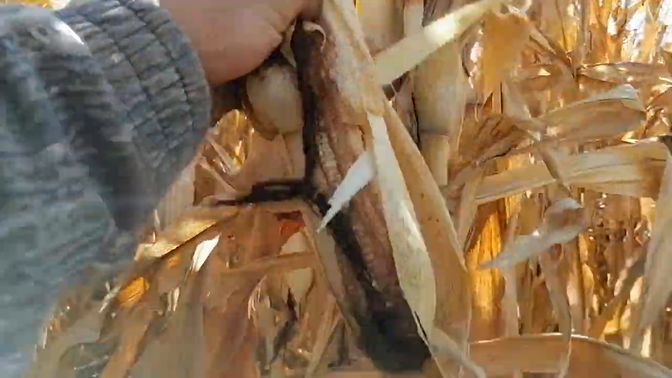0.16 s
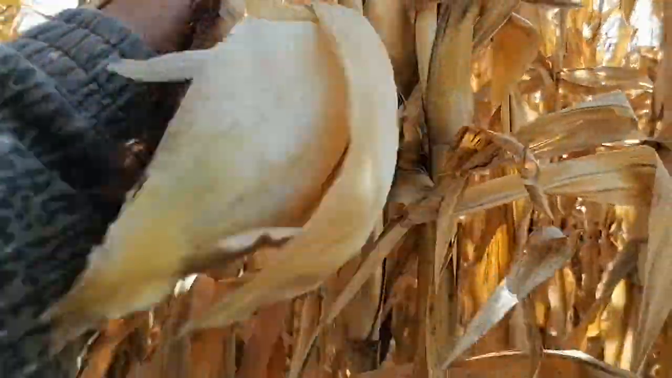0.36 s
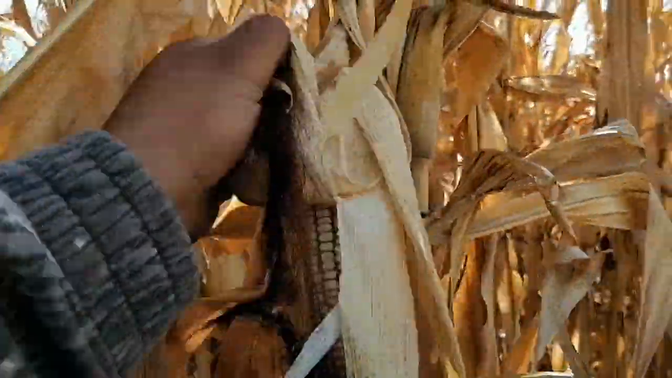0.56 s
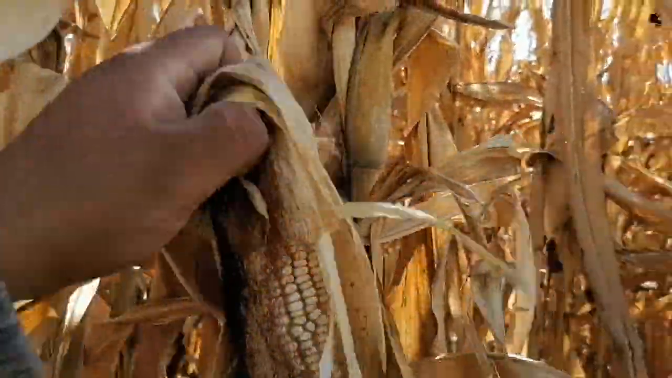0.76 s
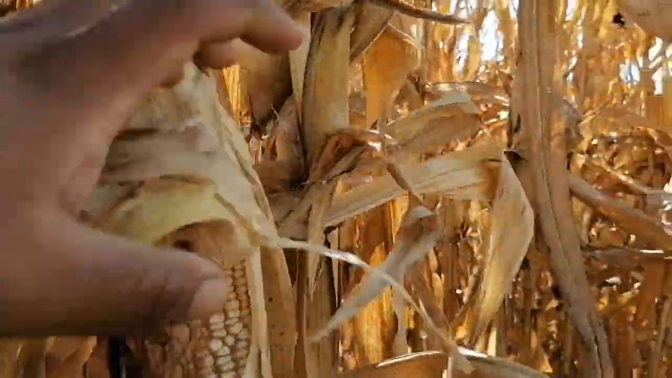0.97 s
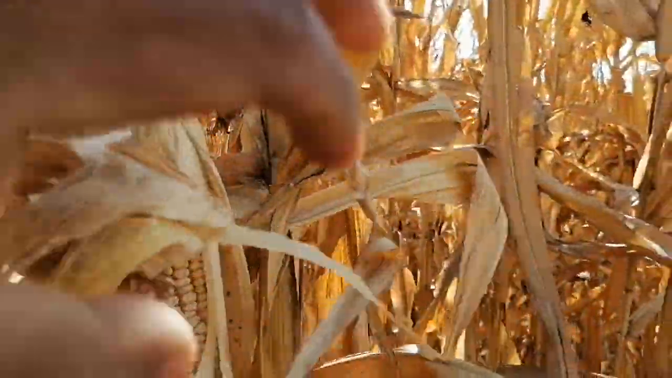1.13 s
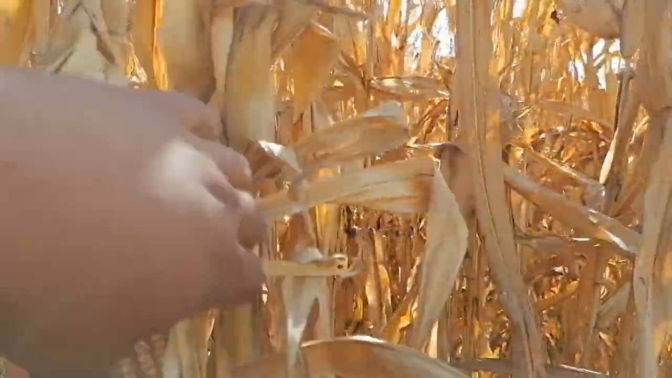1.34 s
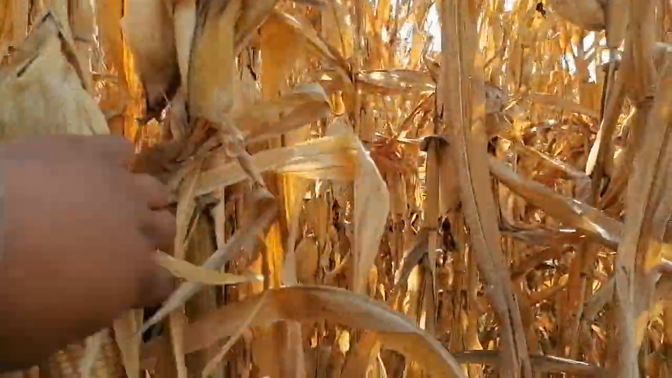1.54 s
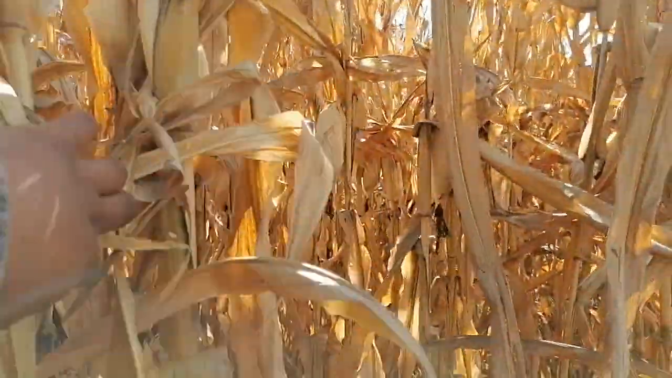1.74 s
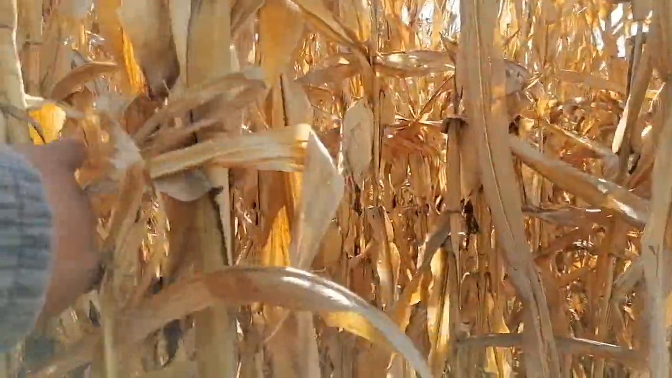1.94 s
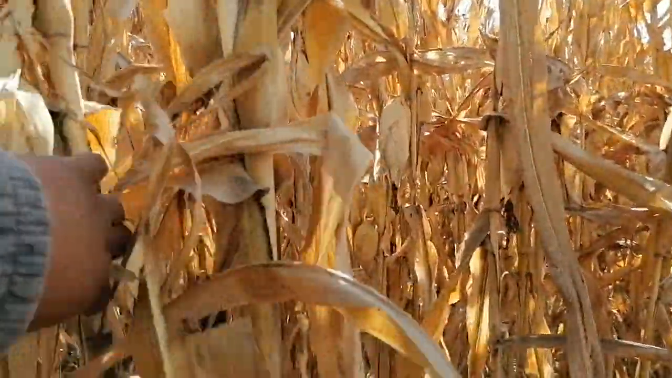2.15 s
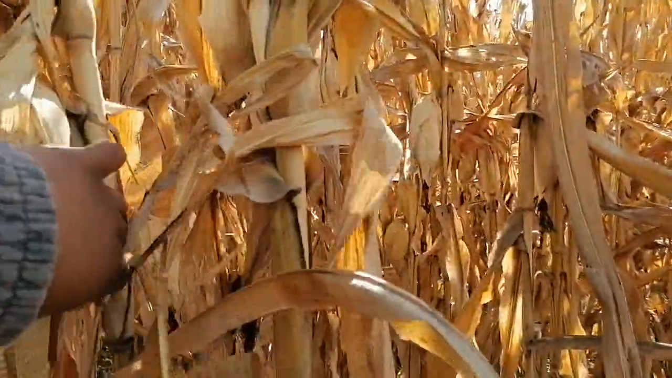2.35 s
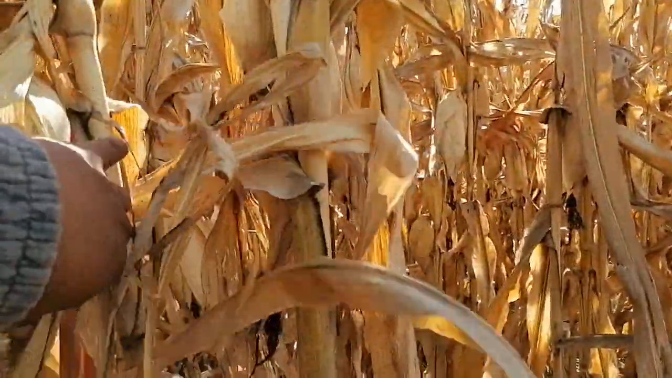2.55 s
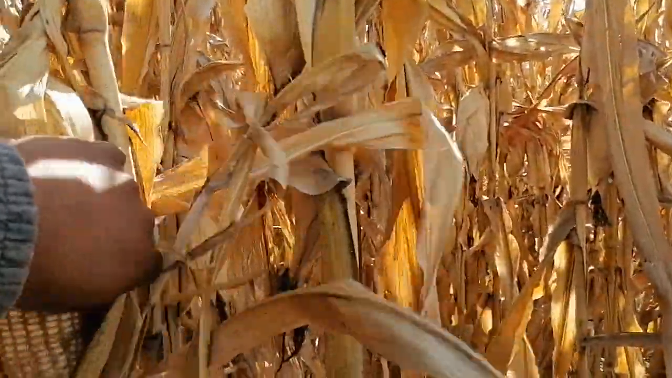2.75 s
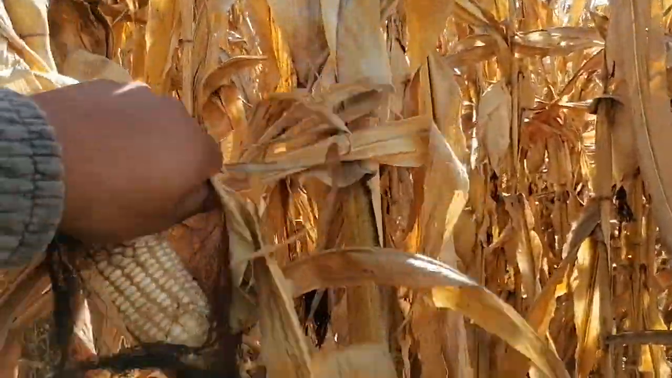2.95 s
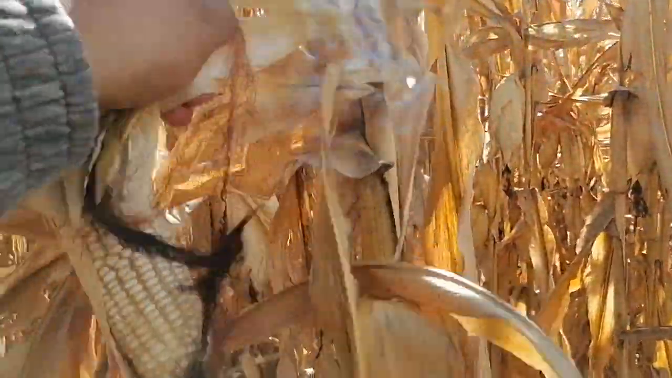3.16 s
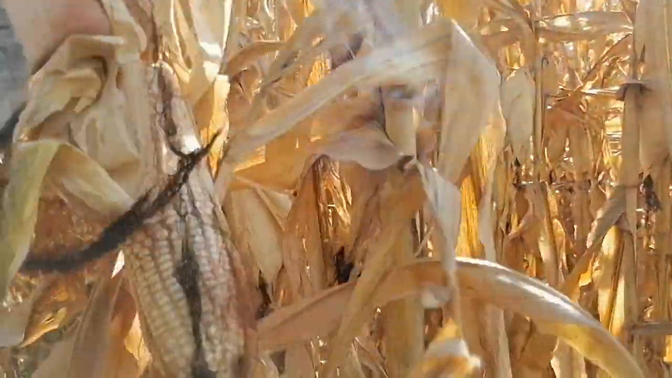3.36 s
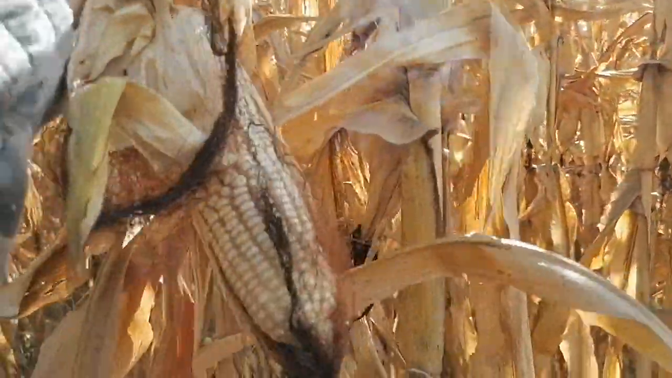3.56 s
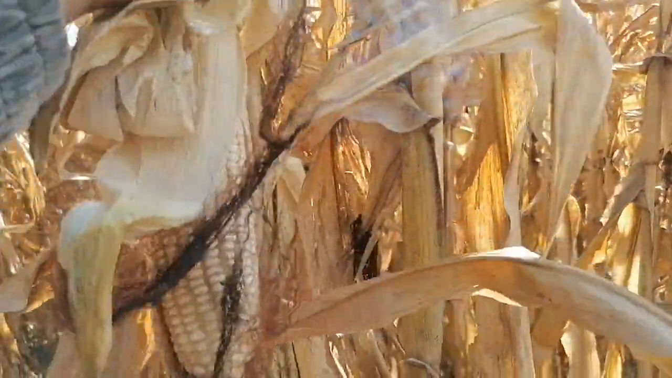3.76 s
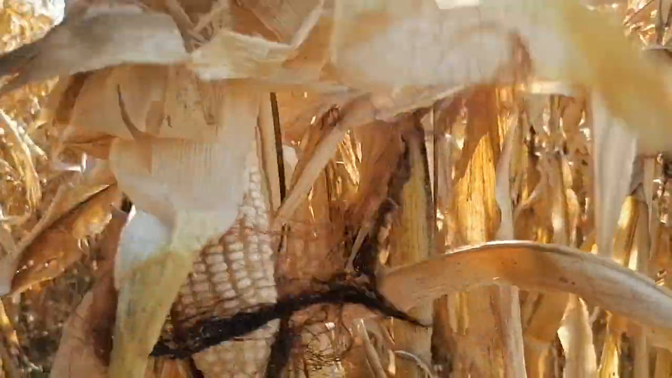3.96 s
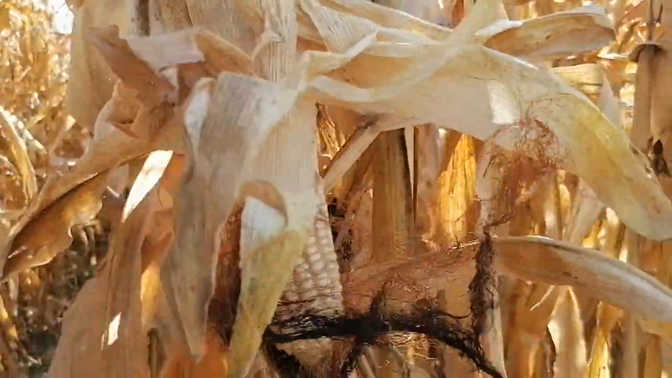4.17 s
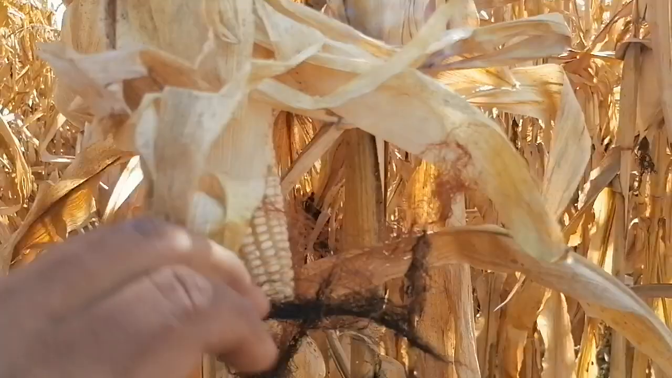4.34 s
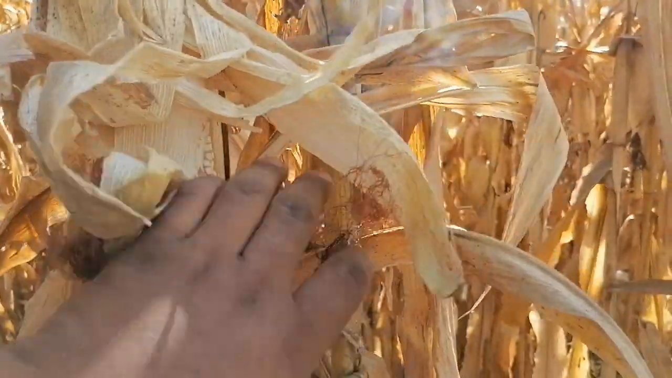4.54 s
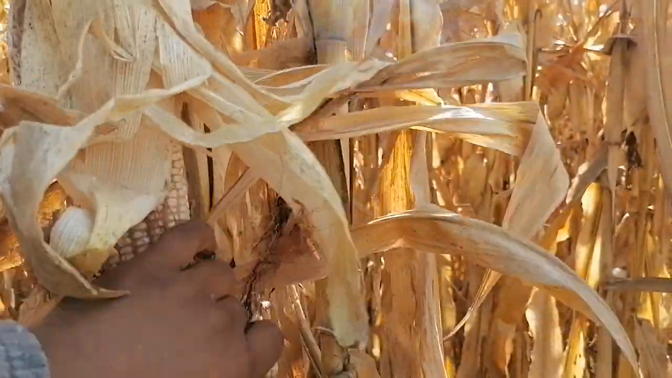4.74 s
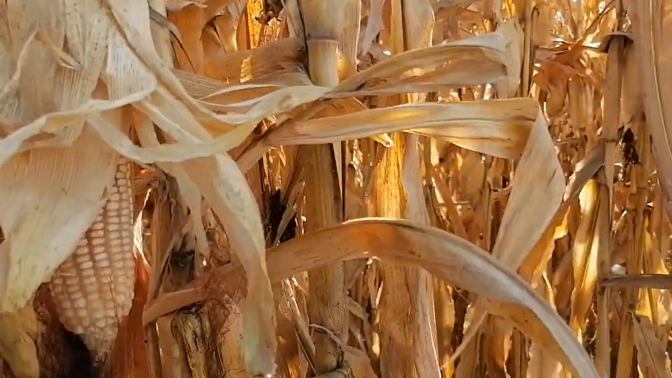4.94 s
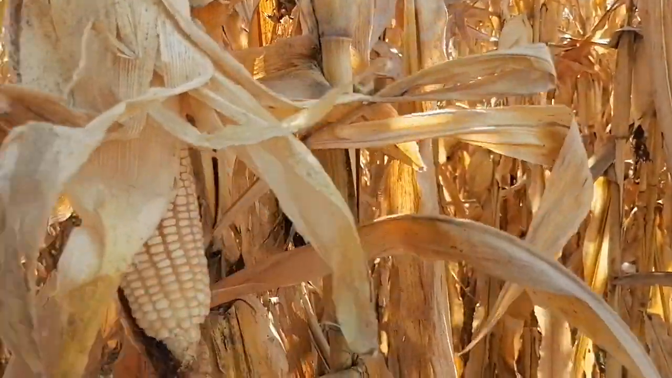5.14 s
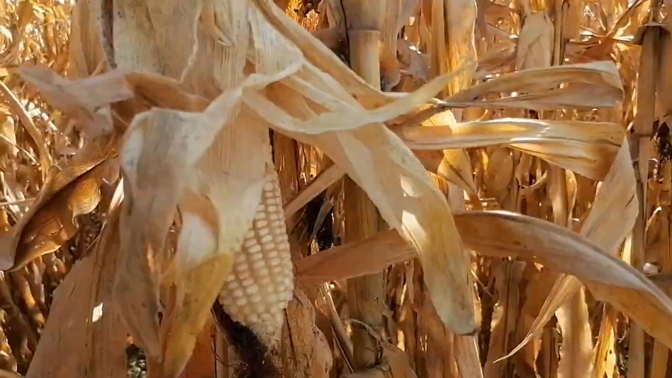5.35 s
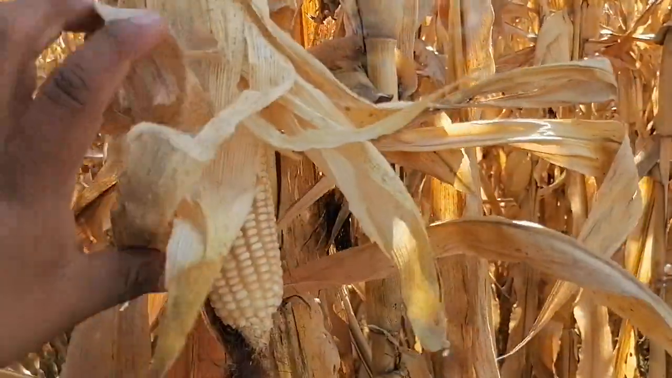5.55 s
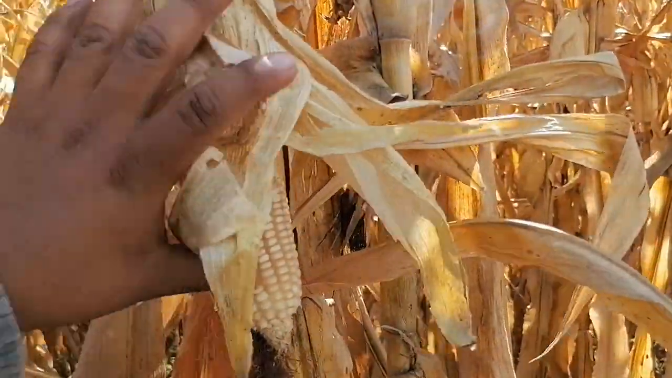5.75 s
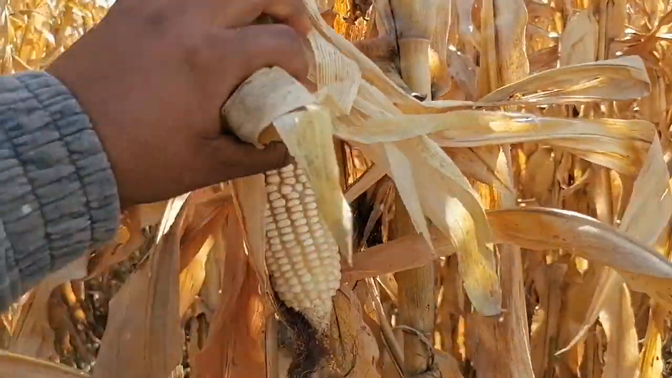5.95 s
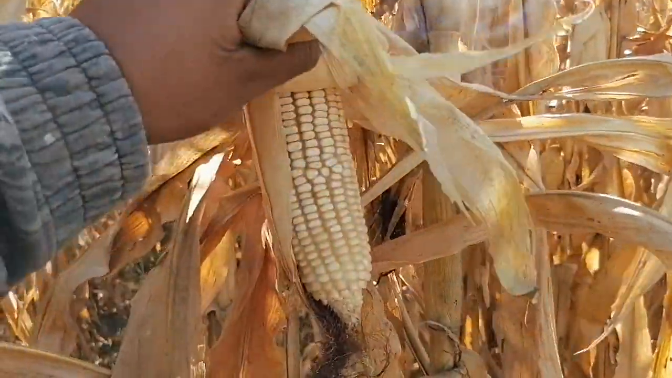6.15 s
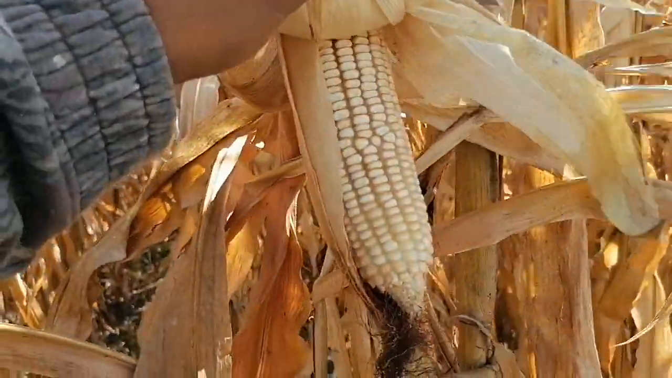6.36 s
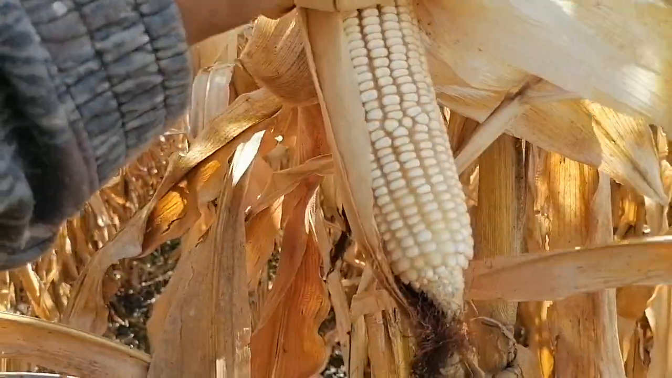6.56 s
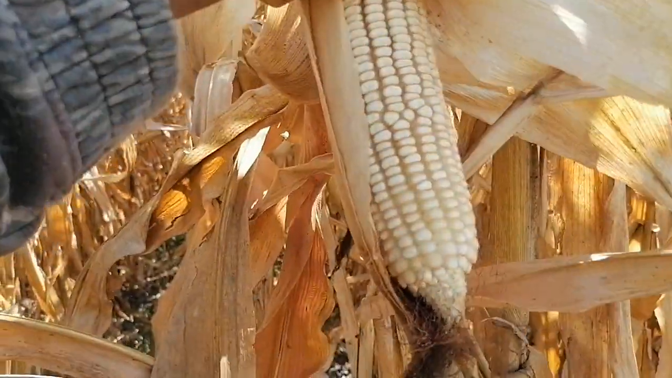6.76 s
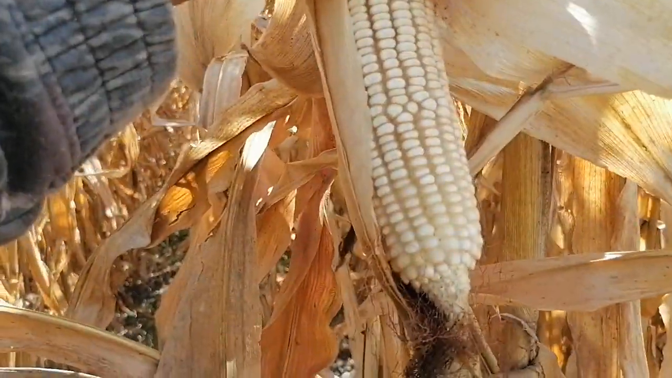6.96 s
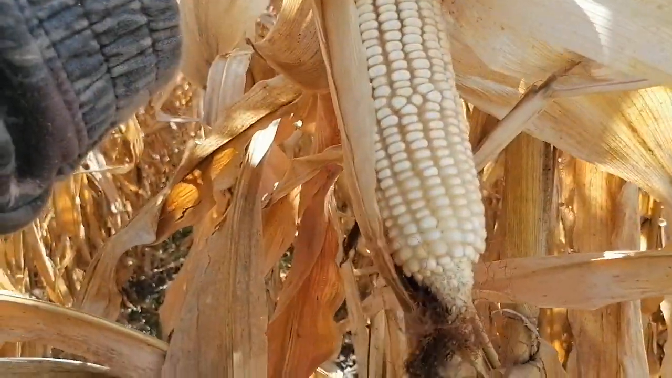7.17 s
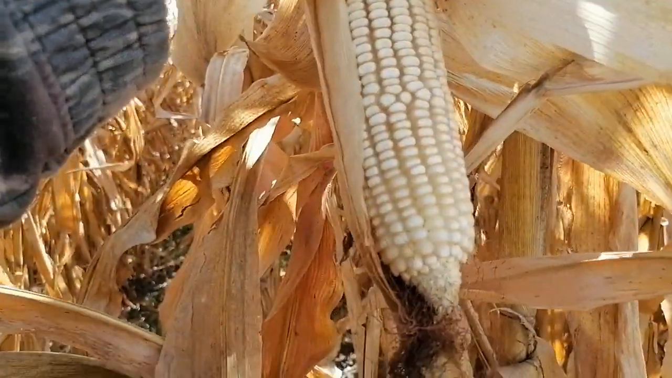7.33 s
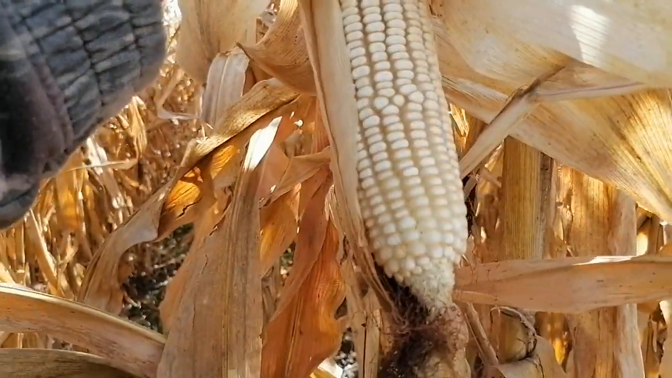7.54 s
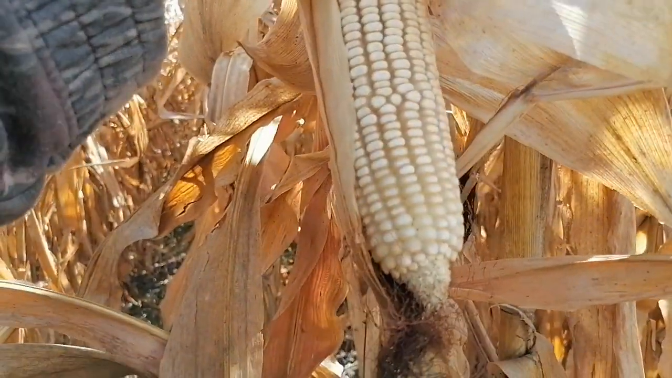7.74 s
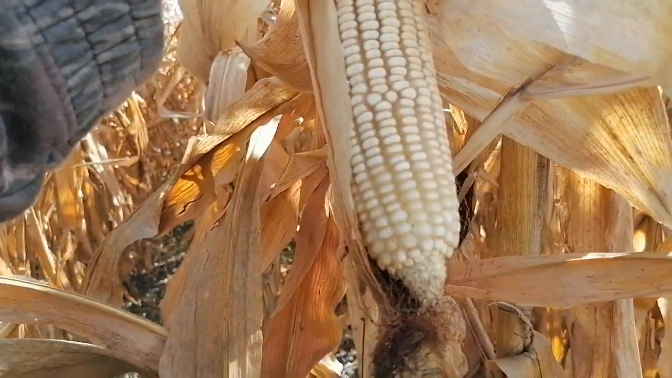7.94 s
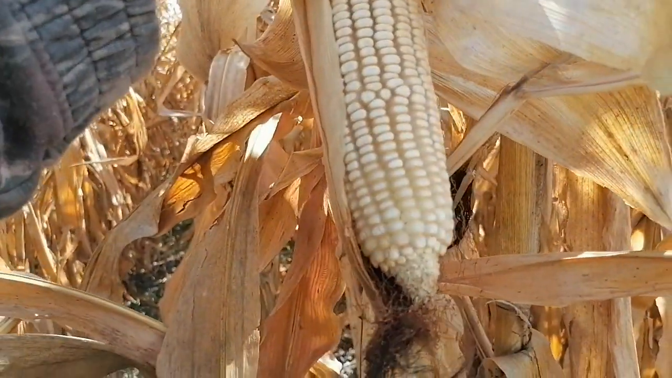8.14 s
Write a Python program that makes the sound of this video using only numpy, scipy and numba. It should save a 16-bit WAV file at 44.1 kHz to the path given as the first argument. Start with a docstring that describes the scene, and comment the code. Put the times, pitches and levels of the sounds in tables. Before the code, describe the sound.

Very close, dry corn husks are pulled off an ear by hand. Sharp snaps and crisp crackling come thick at first, ease into lighter rustling, then burst loudest around three seconds. Afterward the tearing thins to scattered ticks. Outdoors, faint leaf wash and a distant engine rumble lie underneath, with a weak wavering hum near the end. Phone-like stereo pickup, dry, without echo.

```python
"""Husking corn by hand

Dry husks are torn off an ear of corn in a field, close to a phone with two spaced microphones.
The rustle is noise gated by a random rain of tiny cracks in five frequency registers; over it single
fibres snap, each a click and a short noise burst through leaf resonances. Far leaves are filtered
noise, a distant engine is narrow bands of noise, and late on a wavering sine drone swells."""
import sys
import numpy as np
from scipy import signal
from scipy.fft import rfft, irfft
from scipy.io import wavfile
from scipy.ndimage import uniform_filter1d
from numba import njit

SR = 44100
rng = np.random.default_rng(int(sys.argv[2]) if len(sys.argv) > 2 else 0)


def put_to_file(sound):
    """Save the sound as 16-bit audio at rate SR, in the file named by the first command-line argument."""
    columns = np.atleast_2d(sound).T  # one column per channel
    safe = np.clip(columns, -1, 1)
    whole_steps = np.round(safe * 32767)
    wavfile.write(sys.argv[1], SR, whole_steps.astype(np.int16))


N = 366030

# The registers, low to high, are thud, husk body, flex, crackle and air.
# Grains of sound. Each row, a register: decay time t60 in seconds, own size scatter in dB,
# share of the power that follows the grains, 0 to 1.
GRAIN = [(0.13, 8, 0.88), (0.012, 5.5, 0.35), (0.01, 3, 0.44), (0.008, 2.5, 0.55), (0.0055, 1, 0.45)]
# Resonances of the leaf. Each entry, a register: centre frequency in Hz.
RING_HZ = [350, 900, 3000, 5600, 10500]
LAG_S, FAR_LAG_S = 0.0002, 0.00033  # delay of the right microphone for near and far sounds
TOP_HZ = 15800  # upper limit of the phone


def undb(db):
    """Level as an amplitude ratio: 20 dB is a factor of ten."""
    return 10 ** (np.asarray(db) / 20)


def on_log(table, hz):
    """Interpolation of (Hz, value) rows along a logarithmic frequency axis."""
    table_hz, values = np.transpose(table)
    return np.interp(np.log(hz + 1), np.log(table_hz), values)


def causal(db, size=1024):
    """Minimum-phase response of a gain curve: the cepstrum is folded onto positive time."""
    cepstrum = irfft(np.log(undb(db)))
    half = len(cepstrum) // 2
    cepstrum[1:half] *= 2
    cepstrum[half + 1:] = 0
    return irfft(np.exp(rfft(cepstrum)))[:size]


def pair(lag_s):
    """Partial coherence of spaced microphones: noise alike in the bass, its common part late at right."""
    # Likeness of the two channels. Each row: frequency in Hz, coherence from 0 to 1.
    alike = [(60, 0.93), (1000, 0.91), (1500, 0.84), (2500, 0.19), (4500, 0.01), (9000, 0.23)]
    hz = np.arange(N // 2 + 1) * SR / N
    left, other = rfft(rng.standard_normal((2, N)))
    likeness = on_log(alike, hz)
    common = likeness * left * np.exp(-2j * np.pi * hz * lag_s)
    return irfft([left, common + np.sqrt(1 - likeness ** 2) * other], N)


@njit
def ring(x, hz, q):
    """Resonance with a moving centre: a state-variable band-pass of unit peak gain."""
    y = np.empty_like(x)
    for c in range(len(x)):
        band, low = 0., 0.
        for i in range(len(hz)):
            g = np.tan(np.pi * hz[i] / SR)
            v = (band + g * (x[c, i] - low)) / (1 + g * (g + 1 / q))
            band, low = 2 * v - band, low + 2 * g * v
            y[c, i] = v / q
    return y


def walk(rate):
    """Slow random modulation of spread near 1: values held 1 / rate seconds, smoothed twice."""
    hold = int(SR / rate)
    steps = np.repeat(rng.standard_normal(N // hold + 1), hold)
    return 1.5 * uniform_filter1d(uniform_filter1d(steps, hold), hold)[:N]


def registers():
    """Linear filtering by husk and microphones: a left and right impulse response per register."""
    # Borders of the registers. Each entry: frequency in Hz.
    edges_hz = [100, 650, 1550, 4000, 8500, 16500]
    # Leaves heard through the microphones. Each row: frequency in Hz, gain in dB.
    husk_gain = [(59, -51), (100, -9), (358, -3.5), (500, -2.5), (630, -11), (740, -9), (840, -2),
                 (1040, -6), (1280, -2), (1520, -4), (2300, -0.5), (3400, 4), (3940, -1.5), (5080, 6.5),
                 (6020, 6.5), (6990, 8), (9020, -1), (14700, -1), (16000, 0)]
    # Difference between the sides. Each row: frequency in Hz, left minus right in dB.
    left_more = [(60, -8), (110, 11.5), (200, 4.5), (380, 9.5), (700, 5), (1290, 1), (2380, 4.5), (4400, 3),
                 (8120, 1), (15000, -1.5)]
    hz = np.arange(2049) * SR / 4096
    husk_db, half_db = on_log(husk_gain, hz), on_log(left_more, hz) / 2
    responses = []
    for low, high in zip(edges_hz, edges_hz[1:]):
        skirt_db = -20 * np.log10((1 + (low / (hz + 1)) ** 6) * (1 + (hz / high) ** 6))
        responses.append([causal(husk_db + skirt_db + side * half_db) for side in (1, -1)])
    return np.array(responses)


def slow_balance(t):
    """Slow changes of pan, thud level and flex level over time: values in dB at times t."""
    # Each row: time in seconds, left minus right in dB, change of the thud in dB, of the flex in dB.
    balance = [(0, -1, 0.5, 0), (.45, 0, -4, 3), (.8, 0, 0, 0), (1.4, 0, 3, 1), (2.3, -1.5, 2.5, 0),
               (3, 0, -0.5, -1.5), (3.6, -1.5, -3.5, 3), (4.2, -2, -1, 0), (5.2, -0.5, 0, 0.5),
               (6.2, -0.5, -3, 1.5), (6.7, -4.5, -1.5, 1), (7.2, -2, 0.5, 1), (8.3, -0.5, 10, 5.5)]
    s, *columns = np.transpose(balance)
    return [np.interp(t, s, column) for column in columns]


def hand():
    """Addition of incoherent powers: tugs over settling leaves, as crackle and husk body in dB."""
    # Leaves settling between tugs. Each row: time in seconds, crackle level in dB.
    settle = [(0, -52), (1.2, -57), (1.37, -62.5), (1.5, -55), (2.35, -59.5), (3, -49.5), (3.7, -53.5),
              (4.3, -58.5), (4.45, -59.5), (5.9, -61.5), (6.6, -57.5), (6.8, -67.5), (7.3, -71),
              (8.3, -72.5)]
    # Tugs at the leaves. Each row: start in seconds, length in seconds, crackle level in dB
    # at the start, at the end, husk body in dB against the crackle.
    tugs = [(0, 0.14, -42, -47, -9), (.1, 0.23, -58.5, -47, -10.5), (0.329, 0.043, -56, -46.5, -11),
            (0.442, 0.14, -43, -44.5, -12), (0.621, 0.43, -53.5, -51, -4.5), (1.107, 0.15, -61, -57.5, -4),
            (1.456, 0.31, -56.5, -56, -6), (1.682, 0.045, -49, -51.5, -7), (1.798, 0.19, -51, -56, -8.5),
            (2.023, 0.27, -50, -56.5, -12.5), (2.412, 0.11, -54, -53, -11.5),
            (2.694, 0.082, -48.5, -53.5, -7.5), (2.865, 0.29, -46.5, -42.5, -9),
            (3.209, 0.051, -37, -40.5, -11), (3.296, 0.32, -44.5, -46, -17), (3.745, 0.23, -48, -54.5, -8),
            (3.975, 0.22, -49.5, -50.5, -16), (4.489, 0.038, -56.5, -65, -13),
            (4.685, 0.13, -61.5, -60, -26), (4.839, 0.03, -58, -52.5, -8.5),
            (5.241, 0.094, -58, -56, -12.5), (5.42, 0.023, -55.5, -60, -12),
            (5.644, 0.088, -52.5, -53.5, -14), (5.972, 0.25, -53.5, -50, -12),
            (6.332, 0.03, -55, -55.5, -6.5), (6.414, 0.014, -52, -56, -12.5), (6.477, 0.02, -51, -58.5, -7),
            (6.543, 0.043, -50.5, -52, -5), (6.654, 0.02, -55, -65, -1), (7.678, 0.091, -67, -69.5, -12)]
    settle_body_db, flicker_db, flickers_per_s = -10.5, 1.5, 20
    attack_s, release_db_per_s = 0.021, 247
    t = np.arange(N) / SR
    settle_db = np.interp(t, *np.transpose(settle)) + flicker_db * walk(flickers_per_s)
    crackle = undb(2 * settle_db)  # twice the dB gives power
    husk = crackle * undb(2 * settle_body_db)
    for s, length, start_db, end_db, body_db in tugs:
        db = np.interp(t, [s, s + length], [start_db, end_db])
        db -= release_db_per_s * np.clip(t - s - length, 0, 1)
        attack = np.clip((t - s) / attack_s + 1, 0, 1) ** 2  # complete at the start time
        power = attack * undb(2 * db)
        crackle = crackle + power
        husk = husk + power * undb(2 * body_db)
    return 10 * np.log10(crackle), 10 * np.log10(husk)


def rustle(noise, body):
    """Shot noise: random small cracks in clumps gate noise, with grains that differ by register."""
    cracks_per_s, size_db, biggest_db = 600, 4, 9
    clump_db, clumps_per_s = 1.5, 55
    rise_s, even_s = 0.0014, 0.12
    bend_q, bend_share, bend_octaves, bends_per_s = 15.3, 0.68, 0.27, 30
    colour_db, colours_per_s = 1.5, 14  # each register wanders as other leaves bend
    thud_s, air_db = 0.091, -8  # smoothing of the thud level; air against crackle

    crackle, husk = hand()
    pan_db, thud_db, flex_db = slow_balance(np.arange(N) / SR)
    # flex and thud levels are weighted from crackle and husk body
    flex = 0.35 + 0.79 * husk + (1 - 0.79) * crackle + flex_db
    thud = -4 + 0.92 * husk + (1 - 0.92) * crackle
    thud = uniform_filter1d(thud, int(thud_s * SR)) + thud_db  # the thud lingers

    # exponential gaps and exponential sizes in dB
    chance = rng.random((2, N // 8))
    at = np.cumsum(-np.log(1 - chance[0]) * SR / cracks_per_s).astype(int)
    keep = at < N
    at = at[keep]
    sizes = np.minimum(-size_db * np.log(1 - chance[1, keep]), biggest_db)
    sizes = sizes + clump_db * walk(clumps_per_s)[at]

    out = 0
    for k, db in enumerate((thud, husk, flex, crackle, crackle + air_db)):
        t60, scatter_db, share = GRAIN[k]
        grain_db = sizes + scatter_db * rng.standard_normal(len(at))
        power = np.bincount(at, undb(2 * grain_db), N)
        power = signal.lfilter([1], [1, -undb(-120 / (t60 * SR))], power)
        power = uniform_filter1d(power, int(rise_s * SR))
        # the hand sets the slow level, so slow chance swells are evened out
        power /= uniform_filter1d(power, int(even_s * SR)) + 1e-9
        gate = np.sqrt(share * power + 1 - share)

        # the resonance slides as leaves bend
        ring_hz = np.minimum(RING_HZ[k] * 2 ** (bend_octaves * walk(bends_per_s)), TOP_HZ)

        def leaf(source):
            """Resonant coloration: husk response plus a share of its moving ring."""
            x = signal.oaconvolve(source, body[k], axes=1)[:, :N]
            return x + bend_share * ring(x.copy(), ring_hz, bend_q)

        ungated_rms = np.std(leaf(noise).mean(axis=0))
        sound = leaf(noise * gate) / ungated_rms
        out = out + sound * undb(db + colour_db * walk(colours_per_s))
    return out * undb(np.array([pan_db, -pan_db]) / 2)


def snaps(noise, body):
    """Impulse excitation: a fibre's click and noise burst ring the leaf, longest in low registers."""
    # Snapping fibres. Each row: time in seconds, crackle level in dB, flex in dB and husk body in dB
    # against the crackle, crackle decay time t60 in milliseconds; some rows add the ring of the flex
    # in Hz and of the crackle in Hz.
    fibres = [(0.017, -36.5, -6, -12, 12), (0.036, -53, 3, 12, 8.1),
              (0.0548, -31, -6, -16, 9.5, 3300, 5990), (0.0649, -27.5, -11, -10, 18, 2490, 4900),
              (0.0697, -40, -5, -1, 8), (.0753, -34, -4, -15, 13), (.081, -34, 4.5, 0, 7.8, 3010, 5410),
              (0.107, -38, 0, -7, 11), (.122, -37, -7, 2, 16.4), (0.1917, -30.5, -29, -36, 4.8, 2960, 5890),
              (0.2668, -41, -14, -12, 13), (0.2885, -39.5, -10, -8, 10), (.352, -38, 1, -4, 10),
              (0.3614, -36.5, -8, -14, 11), (0.3788, -21.5, -7, -15.5, 9.3, 2340, 6020),
              (0.3975, -34.5, -6, -19, 8, 2420, 4950), (0.441, -33, -17, -27, 12, 2000, 5400),
              (0.45, -35, -4, -10, 7.9), (.46, -38, 1, -14, 8.7), (.478, -32, -13, -16, 8.9),
              (0.55, -38.5, -3, -6, 8.4), (.5752, -38.5, -2, -20, 10), (.632, -40, -11, -21, 7.7),
              (0.7535, -33, -5, -18, 13, 3140, 5070), (.77, -55, -1, 6, 8.7), (0.7822, -33.5, -2, -23, 17),
              (0.785, -34, -8, -17, 14, 3170, 5160), (0.9268, -40, -6, -14, 11), (1.0621, -45, -9, -5, 12),
              (1.073, -42.5, -7, -4, 10), (1.113, -40.5, -5, -10, 16), (1.157, -45, -9, -5, 18),
              (1.179, -54, -4, 4.5, 20), (1.235, -59, 7, 8, 11), (1.2625, -48, -11, -21, 15),
              (1.306, -49, -10, -24, 12), (1.4008, -42, -8, -27, 17), (1.457, -46, -19, 3, 50),
              (1.4772, -54, 6, 5.5, 22), (1.5077, -45, -12, -2, 13), (1.638, -45, -10, -9, 17),
              (1.7209, -44, 4, 5, 14), (1.7457, -54.5, 6, 11.5, 12), (1.824, -45.5, -10, 0, 20),
              (1.841, -40, -2.5, -0.5, 21), (1.8603, -44, -4, -5, 18), (1.8739, -39, -8, -6.5, 6.4),
              (1.8837, -46, -1, -5, 10), (1.9065, -45, -9, -3, 23), (1.9348, -53.5, -7, 9, 22),
              (1.9923, -52, -6, 5.5, 12), (2.041, -46, -9, -9, 10),
              (2.0667, -36, -6.5, -9.5, 9, 3090, 5080), (2.0745, -49, -7, -4, 13),
              (2.0862, -46, -9, -2, 12), (2.4074, -51, -21, -22, 66), (2.4603, -49.5, 5, 0.5, 12),
              (2.4968, -53, 0, 6.5, 25), (2.714, -44.5, -7, 0.5, 3.2), (2.8135, -45.5, -7, -1, 14),
              (2.85, -47, -18, -5, 16), (2.8879, -46.5, -2, 1, 12), (2.906, -43, 0, -13, 10),
              (2.9174, -46, -7, 0, 8.6), (2.9804, -39, -19, -0.5, 6.2), (2.9972, -41, -19, 1, 12),
              (3.0279, -30.5, -25, -8, 14, 3490, 7040), (3.0366, -35, -13, -8, 20),
              (3.1395, -31, -3, -4, 12, 2700, 5340), (3.1888, -35, -7, -8, 14),
              (3.207, -26, -7, -1, 8, 2850, 6180), (3.213, -35.5, -2.5, 0, 76), (3.226, -36, -6, -8, 35),
              (3.4014, -35.5, -10, -14, 8.4, 3370, 4940), (3.4497, -40, -7, -12, 12),
              (3.58, -48, 0, 3, 110), (3.6297, -49, 2, 1, 13), (3.808, -52, 8, 6, 15),
              (3.8503, -40.5, -2, 1, 27), (3.876, -46, -8, -1, 8.5), (3.899, -42, -7, 3.5, 36),
              (3.9106, -42.5, -16, -13, 12), (3.946, -48.5, -15, 7, 45), (3.966, -47.5, -10, -1, 16),
              (3.9968, -49, 6, -8, 12), (4.1148, -40.5, -8, -13, 11), (4.2484, -44, -12, -30, 14),
              (4.346, -47.5, -3, -6.5, 13), (4.4728, -59, -8, -2, 12), (4.5456, -54.5, 3, 1.5, 10),
              (4.6073, -44.5, -12, -14, 5.9), (4.661, -49, -11, -23, 31), (4.6907, -49, -15, -15, 12),
              (4.734, -50, -4.5, -7, 26), (4.768, -46, -11, -15, 21), (4.878, -35, -8, -11, 22, 3660, 6640),
              (4.92, -61, 3, -4, 10), (4.9667, -40, -5.5, -19, 8.5, 3310, 5190), (4.9722, -49, -5, -11, 16),
              (5.1209, -51, -14, -23, 12), (5.192, -52, -9, -23, 9.6), (5.2, -50.5, -4, -24, 12),
              (5.327, -56, 2, -15, 10), (5.426, -48.5, -12, -16, 73), (5.4364, -49, -5, -10, 20),
              (5.7047, -52, -6, -4, 15), (5.735, -45, -12, -16, 19), (5.8, -49.5, -32, -33, 40),
              (5.8715, -55, -12, -3.5, 13), (5.941, -47, -13, -21, 8.2), (5.9954, -56, 5, -14, 11),
              (6.027, -51, -10, -7, 10), (6.058, -44, -12, -14, 12), (6.078, -42, -20, -23, 7.2),
              (6.0857, -41, -7, -12, 7.2), (6.0925, -45, -3, -8, 18), (6.128, -45, -1, -14, 14),
              (6.2115, -49, -12, -23, 12), (6.2189, -47, 0, -17, 7.6), (6.233, -48, -10, -19, 8.8),
              (6.248, -49, -14, -26, 14), (6.2543, -44.5, -9, -26, 32), (6.325, -47, -4, -26, 11),
              (6.376, -46.5, 4, 1, 22), (6.437, -48, -3, -6, 12), (6.476, -49, 1.5, -1, 18),
              (6.495, -44.5, -7, -5, 12), (6.526, -47, -13, -6, 13), (6.5762, -48, 5, -1, 18),
              (6.645, -57, 2, 1, 30), (6.6604, -49, -4, -7, 10), (6.7242, -42, -3, -27, 10, 3170, 8130),
              (6.7457, -49, -3, -18, 12), (6.761, -54.5, -0.5, -1.5, 37), (6.7966, -61, 0, -1, 10),
              (6.886, -60.5, -4, 5, 93), (7.023, -60, -14, -15, 13), (7.075, -57.5, -4, -9, 19),
              (7.1396, -60, -14, -12, 12), (7.1695, -57.5, -1.5, -18, 26), (7.2071, -61, -1, -13, 12),
              (7.2161, -48, -5, -16, 15, 2970, 6260), (7.291, -58, -6, -17, 24), (7.301, -64, -5, 3, 67),
              (7.4115, -53.5, -8, -12, 54), (7.442, -55, -12, -20, 33),
              (7.483, -46.5, -15, -16, 11, 2830, 6030), (7.496, -44, -1, -27, 18, 3020, 5770),
              (7.504, -53, -7, -19, 43), (7.535, -54, -8, -31, 18), (7.636, -59, -16, -15, 16),
              (7.6955, -63, 7, -16, 30), (7.708, -56, -10, -15, 15), (7.715, -50, 1.5, -12, 12, 1940, 6820),
              (7.7449, -59, 1, -5, 13), (7.751, -62, -4, -22, 9.2), (7.768, -62, 3, -11, 15),
              (8.025, -52, -4, -25, 20, 3070, 4650), (8.0942, -57, -6, -15, 17)]
    thud_db, air_db = -12.5, -9.5  # thud against husk body, air against crackle
    rise_share, click_db = 0.04, 13  # rise as a share of the fade; click against the burst's envelope
    ring_q, ring_share, ring_scatter_octaves = 13, 1.16, 0.31
    spread_db = 1  # largest random shift of left minus right
    t = np.arange(4096) / SR
    out = np.zeros((2, N + 8192))
    for s, crackle_db, flex, husk, t60_ms, *rings in fibres:
        pan_db = slow_balance(s)[0] + spread_db * rng.uniform(-1, 1)
        i = int(s * SR)
        puff = np.take(noise, i + np.arange(len(t)), axis=1, mode="wrap")
        click = np.zeros_like(puff)
        click[0, 30] = undb(click_db)
        click[1, 30 + int(LAG_S * SR)] = undb(click_db)
        for k, rel_db in enumerate((husk + thud_db, husk, flex, 0, air_db)):
            fade = t60_ms / 1000 * (GRAIN[k][0] / GRAIN[3][0]) ** 0.18
            shape = (1 - np.exp(-t / (rise_share * fade))) ** 2 * undb(-60 * t / fade)
            sound = signal.fftconvolve(puff * shape + click * shape.max(), body[k], axes=1)

            ring_hz = RING_HZ[k] * 2 ** (ring_scatter_octaves * rng.uniform(-1, 1))
            if rings and k in (2, 3):
                ring_hz = rings[k - 2]
            sound += ring_share * signal.lfilter(*signal.iirpeak(ring_hz, ring_q, SR), sound)

            # the level is the peak of the RMS over 2 ms
            peak = np.sqrt(np.max(uniform_filter1d(sound.mean(axis=0) ** 2, size=88)))
            side_db = np.array([[pan_db], [-pan_db]]) / 2
            gain = undb(crackle_db + rel_db + side_db) / peak
            j = i - np.argmax(np.abs(body[k][0]))  # aligns the peaks of the register responses
            out[:, j:j + sound.shape[1]] += gain * sound
    return out[:, :N]


def wash():
    """Spectral shaping: far leaves as softly wavering filtered noise."""
    # Spectrum of the far leaves. Each row: frequency in Hz, relative level in dB per Hz.
    far_leaves = [(59, -40), (100, -11.5), (266, 6.5), (535, -4), (891, -0.5), (1310, -8), (2930, -9),
                  (3860, -26), (5530, -31), (14700, -40), (16000, -33)]
    level_db = -71.5
    hz = np.arange(N // 2 + 1) * SR / N
    sound = irfft(rfft(pair(FAR_LAG_S)) * undb(on_log(far_leaves, hz)), N)
    return sound / np.std(sound) * undb(level_db + walk(4.0))


def engine():
    """Narrow-band noise: the smeared spectral lines of a distant engine's rumble."""
    # Smeared lines. Each row: centre in Hz, width in Hz, relative level in dB.
    lines = [(44.2, 10, -0.5), (65.4, 17, -2.5), (30, 16, -18), (102, 44, -8)]
    # Swell of the rumble. Each row: time in seconds, level in dB.
    rumble = [(0, -77), (.7, -67.5), (2, -72.5), (5, -74), (5.6, -67.5), (6.1, -73.5), (7.1, -69.5),
              (7.4, -73), (7.8, -69), (8.3, -70.5)]
    hz, t = np.arange(N // 2 + 1) * SR / N, np.arange(N) / SR
    power = 0
    for line_hz, width_hz, db in lines:
        power = power + undb(2 * db) / width_hz / (1 + (2 * (hz - line_hz) / width_hz) ** 4)
    sound = irfft(rfft(pair(FAR_LAG_S)) * np.sqrt(power), N)
    return sound / np.std(sound) * undb(np.interp(t, *np.transpose(rumble)))


def drone():
    """Frequency and amplitude modulation: a wavering sine swells, breaks up and drops away."""
    # Swells of the drone. Each row: time of the peak in seconds, level in dB, rise in seconds.
    swells = [(6.59, -72, .08), (6.93, -70, .12), (7.39, -72, .15), (7.76, -77.5, .2), (8.19, -71, .13)]
    centre_hz, waver_hz, drop_s = 258, 4.95, 0.07
    t = np.arange(N) / SR
    tone = np.sin(2 * np.pi * np.cumsum(centre_hz + waver_hz * walk(19)) / SR)
    tone = tone * undb(2.2 * walk(15))  # it breaks up
    envelope = 0
    for s, db, rise in swells:
        width = np.where(t < s, rise, drop_s)
        envelope = envelope + undb(db) * np.exp(-((t - s) / width) ** 2)
    return np.sqrt(2) * tone * envelope  # root two sets the sine's RMS to the level


def scene():
    """Superposition of the near leaves, the snapping fibres and the field."""
    body = registers()
    near = rustle(pair(LAG_S), body) + snaps(pair(LAG_S), body)
    return near + wash() + engine() + drone()


def record(dry):
    """Band limitation: the phone cuts the top with a steep elliptic low-pass."""
    low_pass = signal.ellip(10, .5, 80, TOP_HZ, fs=SR, output="sos")
    return signal.sosfilt(low_pass, dry)


dry = scene()
out = record(dry)
put_to_file(out)
```